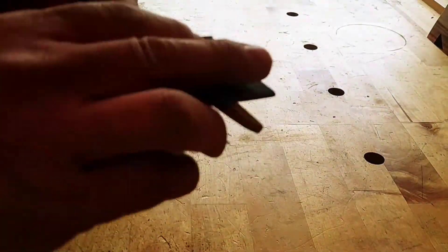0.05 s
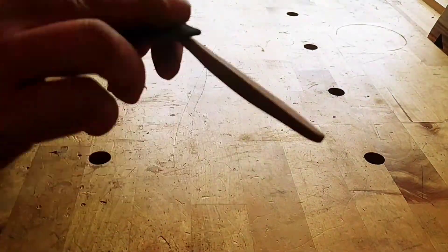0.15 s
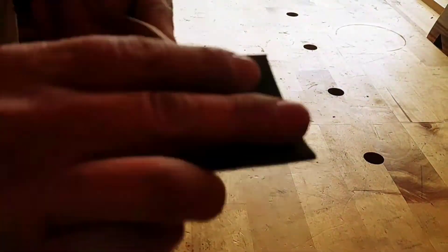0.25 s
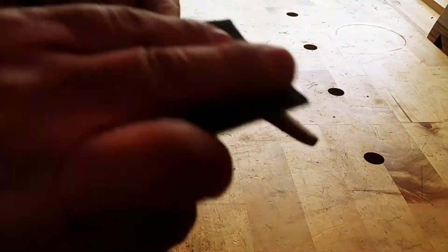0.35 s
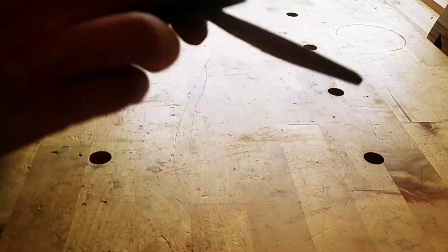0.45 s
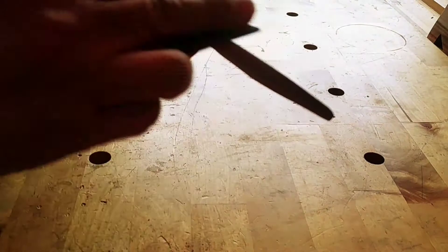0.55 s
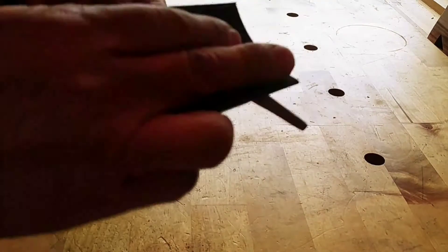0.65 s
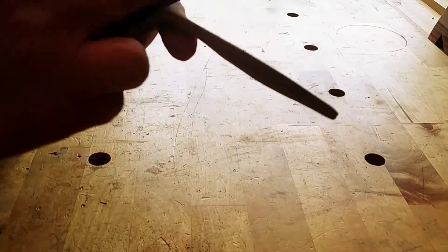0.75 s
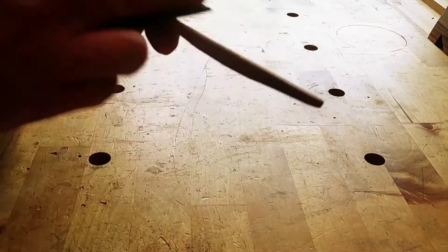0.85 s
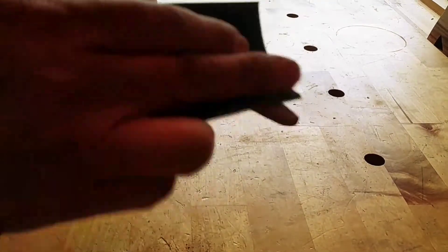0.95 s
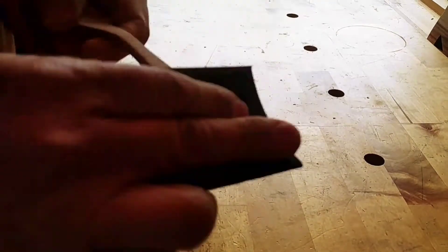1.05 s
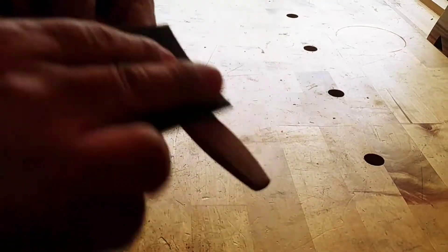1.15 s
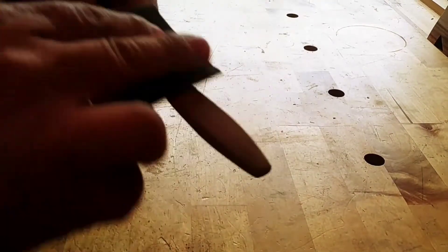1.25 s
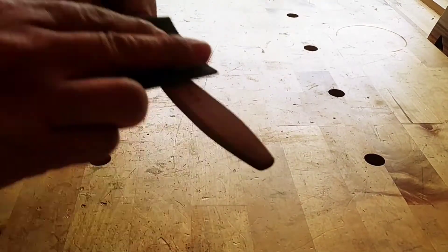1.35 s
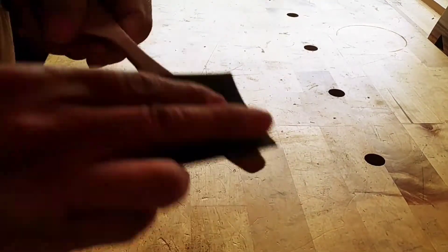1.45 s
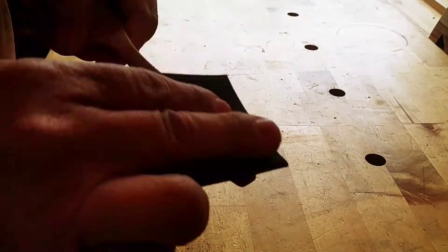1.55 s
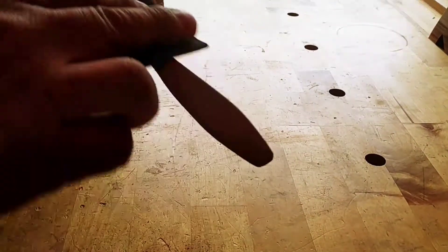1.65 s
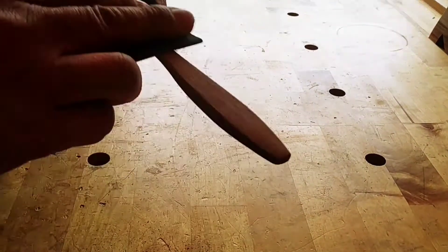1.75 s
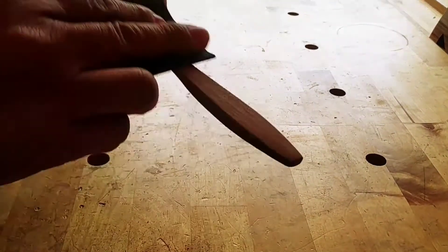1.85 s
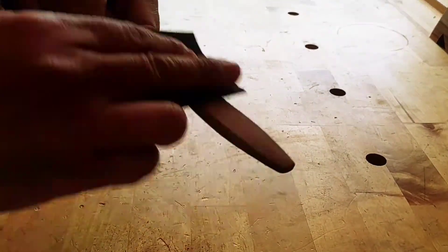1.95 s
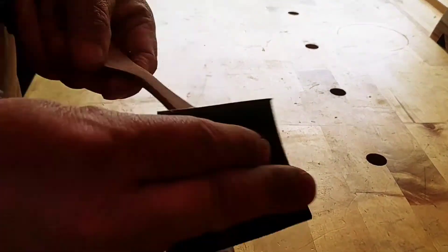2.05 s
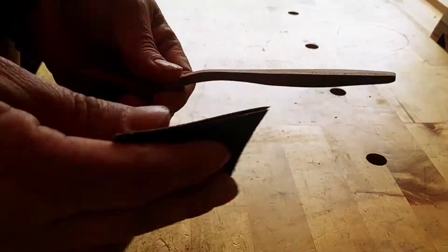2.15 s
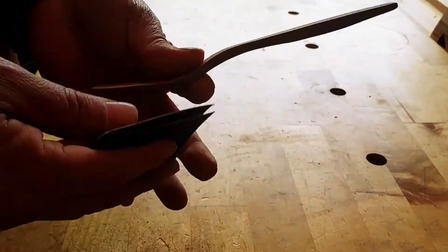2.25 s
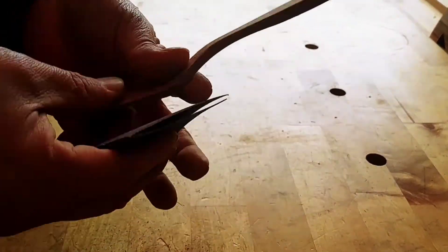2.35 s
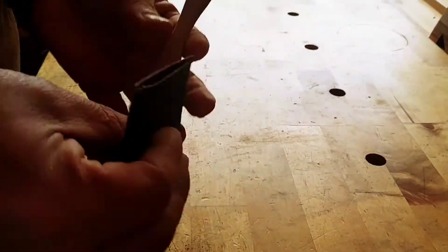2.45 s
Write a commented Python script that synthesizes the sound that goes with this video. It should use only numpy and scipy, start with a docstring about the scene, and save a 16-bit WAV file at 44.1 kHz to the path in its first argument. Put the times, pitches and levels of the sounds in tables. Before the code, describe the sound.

Sandpaper scrapes rapidly back and forth on a thin wooden blade, about fifteen strokes a second, after a brief faint brushing and ending in near quiet; close stereo microphone, small dry room, low rumble.

```python
"""Fast, gritty scrapes to and fro: sandpaper rubbed along a thin wooden blade close to a two-port microphone.
Dense random ticks make the grit; each stroke shapes them in five bands and rings one band of the blade.
Before and after the strokes the same grit, played softly, is the paper brushing lightly.
Short reflections surround it, over low, slowly wandering workshop rumble and faint hiss.
"""
import sys
import numpy as np
from scipy import signal
from scipy.fft import rfft, irfft
from scipy.io import wavfile
from scipy.ndimage import uniform_filter1d

SR = 44100
rng = np.random.default_rng(int(sys.argv[2]) if len(sys.argv) > 2 else 0)


def persist_wave(psi):
    """Save psi, clipped to +-1, as 16-bit WAV."""
    counts = np.round(np.clip(psi, -1, 1) * 32767).astype(np.int16)
    wavfile.write(sys.argv[1], SR, np.atleast_2d(counts).T)


N = 110250  # 2.5 s

# Colour of the grit at each port: (frequency [Hz], left gain [dB], right gain [dB])
PORT_COLOUR = [(300, -25.5, -26), (556, -25, -26.5), (855, -21, -23.5), (950, -21.5, -24),
               (1430, -23.5, -25.5), (2330, -13, -16), (3230, -7.5, -10), (3570, -9, -17.5),
               (4230, -8, -11), (5500, -5.5, -13), (6300, -5.5, -19), (7040, -5.5, -23.5),
               (7220, -0.5, -23.5), (7670, 2.5, -20.5), (8480, -7.5, -22), (9510, -18, -31),
               (11160, -25.5, -30.5), (11400, -21, -33.5), (13500, -23, -25.5), (15500, -19, -31.5)]
# How much of the grit both ports share: (frequency [Hz], likeness [0-1])
GRIT_LIKENESS = [(500, .9), (1500, .5), (3000, .45), (5000, .3), (9000, .15)]
BODY_HZ, RASP_HZ, TREBLE_HZ, AIR_HZ = 1470, 3960, 6570, 9700  # edges of body, rasp, middle, treble, air
LOW_CUT_HZ = 250


def sanding():
    """Grit takes on the colour of each port, then the hand drives its five bands separately."""
    hz = np.fft.rfftfreq(N, 1 / SR)
    ports = pair(*grit(), GRIT_LIKENESS, hz)
    under = [1 / (1 + (hz / edge) ** 8) for edge in (BODY_HZ, RASP_HZ, TREBLE_HZ, AIR_HZ)]
    shares = [under[0], under[1] - under[0], under[2] - under[1], under[3] - under[2], 1 - under[3]]
    low_cut = 1 / (1 + (LOW_CUT_HZ / (hz + 1)) ** 4)
    bands = []
    for port in range(2):
        colour = low_cut * gain_of(read(PORT_COLOUR, hz, col=port + 1))
        bands.append([coloured(ports[port], colour * share) for share in shares])
    bands = np.array(bands)
    reference = np.std(bands[0, 1] + bands[0, 2])  # left rasp plus middle sets the level
    return (bands * hand()).sum(1) / reference


# How strongly the paper still drags while the hand turns, body to air: gain per band [dB]
DRAG_DB = [-10, -7.5, -19.5, -46, -14]
ROUND_MS, DRAG_SAMPLES = 4.1, 3500  # smoothing of the stroke edges and of the drag


def hand():
    """The hand's motion as gain over time (port, band): strokes, drag between them, light brushing."""
    t = np.arange(N) / SR
    power = uniform_filter1d(stroke_power(t), int(ROUND_MS * SR / 1000), axis=2)
    drag = uniform_filter1d(power, size=DRAG_SAMPLES, axis=2) * gain_of(DRAG_DB)[:, None] ** 2
    power += drag * ((t > STROKES[0][0]) & (t < STROKES[-1][0]))
    power += brush_power(t)
    return np.sqrt(abs(power))


# Strokes of the paper; level, treble and rasp are at mid-hold, swells run across the hold:
# (start [s], blade ring [Hz], hold [s], level [dB], level swell [dB], rise [ms], fall [ms], treble [dB],
#  rasp [dB], body [dB], left over right above the body [dB], rasp swell [dB], treble swell [dB])
STROKES = [(0.208, 2160, 0.064, -23.5, -7.5, 3, 7.9, -2, 0, -2, 1.5, -7, -4),
           (0.318, 3670, 0.061, -27.5, 3.5, 12, 1, -2.5, -0.5, 1.5, -0.5, 7, 6),
           (0.404, 4170, 0.035, -18, -6.5, 1.7, 8.1, -7.5, -2, -3, 0, -1, 9),
           (0.48, 5800, 0.039, -25, -3, 2.8, 5.4, 2.5, 2, -2.5, -1, 5, 1),
           (0.549, 2950, 0.04, -22.5, -3.5, 11.5, 3.9, -1, 0, -1, -0.5, 5, -1),
           (0.612, 4440, 0.049, -30.5, -4, 2.6667, 2.6667, 6, 5, 2, -3, 3, 0),
           (0.691, 2350, 0.036, -31, -11, 13.3, 9.1, 10, 5.5, 7.5, -2, 19, 19),
           (0.754, 2740, 0.042, -27.5, 1, 11, 1, 0, -1, -2, -3, 1, 9),
           (0.824, 2070, 0.041, -28, -5.5, 6.7, 5.2, 2, 3.5, 5, -0.5, 9, 8),
           (0.901, 4700, 0.043, -28.5, -3, 5.2, 3.8, 3.5, 1, 5, -3, 3, 3),
           (0.967, 5000, 0.038, -25, 6.5, 3.9, 2.2, -6.5, 0, 0, 0.5, 7, -11),
           (1.027, 2550, 0.051, -26, -5, 10, 6.7, -1.5, 2, 5, -1, -2, 10),
           (1.09, 4800, 0.036, -25, -3.5, 15, 14, 0, 0.5, -0.5, -1.5, 8, 5),
           (1.158, 4070, 0.044, -28, -1, 2.3333, 6, 3.5, -0.5, -0.5, -2, 10, 8),
           (1.221, 3850, 0.038, -25.5, 5, 1, 9.2, -1, -1, -2.5, -1, -5, -3),
           (1.28, 6000, 0.039, -25.5, -2.5, 3.1, 9.4, 6.5, 1, -4, -2.5, 5, 0),
           (1.343, 3700, 0.031, -19.5, 9.5, 4.4, 8.8, 3, -1.5, -2, -0.5, -4, -5),
           (1.406, 2960, 0.034, -28, -6.5, 4.3, 5, 8.5, 1.5, 2, -3.5, 6, 3),
           (1.472, 3420, 0.028, -24, -2.5, 23, 2, 5, 0, 0.5, -1.5, 2, 4),
           (1.522, 4830, 0.035, -32.5, 5, 1.3333, 8.1, 11.5, 1, 3, -3, 6, -2),
           (1.594, 2600, 0.039, -23.5, -4, 8.5, 2, 2.5, -6.5, -1.5, -0.5, -13, -6),
           (1.654, 6240, 0.032, -30.5, -1.5, 7.4, 11, 10.5, 0.5, 4.5, -3.5, 9.5, 0.5),
           (1.734, 3520, 0.028, -23.5, -1.5, 10, 11.6, 3, -2, -0.5, -0.5, 6, -1),
           (1.782, 6700, 0.036, -28, 11, 4.9, 8.9, 8.5, -3.5, 3.5, -3, 5.5, 2),
           (1.851, 3300, 0.038, -23.0, 2.5, 4.9, 8.6, 2.5, 0, -2, -2, -2.5, 6),
           (1.918, 1950, 0.033, -24.5, -4.5, 8.9, 3.3333, 4.5, -2, -2.5, -2, 3.5, -7),
           (1.971, 3930, 0.034, -26, 2, 6.1, 5.7, 3.5, 2.5, 1.5, -2, 3, 6),
           (2.032, 3400, 0.027, -26.5, 1, 2.3, 6.8, 7.5, -1.5, -3.5, -3.5, 7, 1),
           (2.086, 2850, 0.046, -27, 2.5, 39, 6.5, 5, 0, 2, -2.5, -5, 2),
           (2.162, 3020, 0.057, -27, -2.5, 1.6, 3.6, 6, 2.5, 5, -3, 13.5, 0.5)]
# Moments where the grit bites harder: (onset [s], nominal peak level [dB])
BITES = [(0.211, 1.5), (0.217, 1.5), (0.5124, -11), (0.6552, -13), (0.717, -14.5), (1.1993, -21),
         (1.2226, -15), (1.304, -8), (1.3575, -3), (1.367, -1), (1.4072, -13.5), (1.4196, -4.5),
         (1.5238, -19), (1.5443, -3.5), (1.6018, -3), (1.6904, -18), (1.8096, -15.5), (1.9196, -9)]
BITE_MS, BITE_CREST_DB = 1.3, 17.5  # delay and half width; nominal peak over mean level
ARCH_DB = 1.5  # the hand is fastest in mid-stroke
EDGE_DB = -20  # level change over one rise or fall time
AIR_FOLLOWS = 0.46  # share of the treble change that reaches the air band


def stroke_power(t):
    """Each stroke rises, arches over its hold and falls; faster rubbing and bites add power."""
    out = np.zeros((2, 5, N))
    for (start, _, hold, db, swell_db, rise_ms, fall_ms, treble_db, rasp_db, body_db, pan_db,
         rasp_swell_db, treble_swell_db) in STROKES:
        near = slice(round((start - .08) * SR), round((start + hold + .12) * SR))
        since = t[near] - start
        along = np.clip(since / hold, 0, 1) - .5
        rise = 1000 * np.maximum(-since, 0) / rise_ms
        fall = 1000 * np.maximum(since - hold, 0) / fall_ms
        arch_db = -ARCH_DB * (2 * along) ** 2
        power = gain_of(db + swell_db * along + arch_db + EDGE_DB * (rise + fall)) ** 2
        for onset, peak_db in BITES:
            if start - .01 < onset < start + hold + .01:
                bump = np.exp(-(1000 * (t[near] - onset) / BITE_MS - 1) ** 2)
                power = power + gain_of(peak_db - BITE_CREST_DB) ** 2 * bump
        rasp = rasp_db + rasp_swell_db * along
        treble = treble_db + treble_swell_db * along
        flat = 0 * along
        left_db = [flat + body_db, rasp, flat, treble, AIR_FOLLOWS * treble]
        # the treble and its swell reach only the left port; the right sits lower above the body by the left-
        # over-right value
        right_db = [flat + body_db, rasp - pan_db, flat - pan_db, flat - pan_db, flat - pan_db]
        out[..., near] += power * gain_of([left_db, right_db]) ** 2
    return out


# Light brushing before and after the strokes; band columns are relative to the level:
# (time [s], level [dB], treble [dB], rasp [dB], body [dB])
BRUSH_BEFORE = [(0, -47, -15, 12.5, 14), (0.018, -50, -7, 13.5, 12), (0.026, -56, 1, 5, 29.5),
                (0.055, -54.5, 2, 2, 19), (0.062, -55, 9.5, 4.5, 19), (0.1, -49.5, 6, -4, 11),
                (0.115, -54, 1, -2, 13), (0.14, -71, -2, 5, 2), (0.15, -62, -2, -11, -7),
                (0.165, -57.5, 5, 1, 4), (0.19, -60, 1, 1, -6), (0.2, -36.5, 3, -3, 10)]
BRUSH_AFTER = [(2.231, -54, -8, 11, 6), (2.245, -58, -17, 16.5, 9), (2.268, -64, -13, 5, 0),
               (2.279, -48, 5, -1.5, -3), (2.292, -65, -2, 4, 0), (2.32, -81, -1, 0, 0),
               (2.339, -74, -3, 1, 0), (2.352, -73, -3, 0, 0), (2.361, -54, -10.5, -1, 5),
               (2.385, -64.5, -10, 3.5, -5), (2.411, -76, -4, -3, 5), (2.416, -63, -7, 17, 5),
               (2.421, -75, -6, 3, 0), (2.455, -77.5, -4.5, 0, 3), (2.462, -54, -6, 3, -2.5),
               (2.467, -56.5, -6, 2, -3), (2.473, -40.5, -11, -4, 6), (2.488, -59, -4, 1, 9),
               (2.499, -57, 0, 0, 0)]
BRUSH_MID_DB, BRUSH_AIR_DB = -9, 0  # brushing is hollower in the middle band


def brush_power(t):
    """Light contact of the paper: a wavering level with its own band balance, equal at both ports."""
    out = np.zeros((5, N))
    for part in (BRUSH_BEFORE, BRUSH_AFTER):
        s, db, treble_db, rasp_db, body_db = np.transpose(part)
        balance_db = (body_db, rasp_db, BRUSH_MID_DB, treble_db, BRUSH_AIR_DB)
        bands_db = [np.interp(t, s, db + band_db) for band_db in balance_db]
        out += gain_of(bands_db) ** 2 * ((t > s[0] - .002) & (t < s[-1] + .002))
    return out


GRIT_PER_S, GRIT_SPREAD_DB = 20000, 1.5  # tick rate; scale of the random boost per tick
CLUMP_DB, CLUMP_MS = 1, 2.1  # depth and smoothing of the clumping
PATCH_DB = 2.5  # colour drifts as other parts of the blade sound
RING_DB, RING_OCTAVES = 4, 0.13  # height and half width of the band that rings in each stroke
BEFORE_RING_HZ, BEFORE_RING_DB = 3450, 8.5  # ring of the brushing before
AFTER_RING_HZ, AFTER_RING_DB = 5330, 6  # ring of the brushing after


def grit():
    """Abrasive grains make dense, uneven, clumped ticks; colour drifts and a blade band rings per stroke."""
    ticks = (rng.random((2, N)) < GRIT_PER_S / SR) * rng.standard_normal((2, N))
    ticks = ticks * gain_of(GRIT_SPREAD_DB * np.minimum(rng.exponential(1, (2, N)), 4))
    wide = int(CLUMP_MS * SR / 1000)
    clumps = evened(uniform_filter1d(uniform_filter1d(rng.standard_normal(N), wide), wide))
    hz, t, z = signal.stft(ticks * gain_of(CLUMP_DB * clumps), SR, nperseg=512, noverlap=384)

    starts = [0] + [row[0] for row in STROKES] + [BRUSH_AFTER[0][0]]
    now = np.searchsorted(starts, t + .01, "right") - 1  # the ring moves 10 ms ahead of the stroke
    ring_hz = np.r_[BEFORE_RING_HZ, [row[1] for row in STROKES], AFTER_RING_HZ][now]
    ring_db = np.r_[BEFORE_RING_DB, np.full(len(STROKES), RING_DB), AFTER_RING_DB][now]
    octaves_off = np.log2((hz[:, None] + 1) / ring_hz)
    ring_db = ring_db * np.exp(-(octaves_off / RING_OCTAVES) ** 2)

    patches = rng.standard_normal(z.shape[1:])
    patches = uniform_filter1d(uniform_filter1d(patches, size=3, axis=0), size=8, axis=1)
    z = z * gain_of(PATCH_DB * evened(patches) + ring_db)
    return signal.istft(z, nperseg=512, noverlap=384)[1][:, :N]


ROOM_DB, ROOM_T60 = -16, .06  # reflection level; time to fall 60 dB [s]


def room(x):
    """A short decaying spray of reflections, different at each port."""
    t = np.arange(SR // 4) / SR
    tail = rng.standard_normal((2, len(t))) * gain_of(-60 * t / ROOM_T60) * (t > .003)
    return signal.fftconvolve(x, tail / np.linalg.norm(tail[0]), axes=1)[:, :N]


# Spectrum of the workshop rumble: (frequency [Hz], relative level [dB per Hz])
RUMBLE_COLOUR = [(13, -42), (22, -12), (86, 1), (151, -1.5), (215, -4.5), (320, -15.5), (420, -28),
                 (700, -120)]
RUMBLE_DB = -45.5  # before the left-right tilt
SWELL_DB = 1.5  # the rumble wanders


def rumble(hz):
    """Low workshop noise: filtered noise whose level wanders slowly."""
    low = pair(*rng.standard_normal((2, N)), BACKGROUND_LIKENESS, hz)
    swell = uniform_filter1d(uniform_filter1d(rng.standard_normal(N), size=3000), size=3000)
    low = coloured(low, gain_of(read(RUMBLE_COLOUR, hz))) * gain_of(SWELL_DB * evened(swell))
    return gain_of(RUMBLE_DB) * evened(low)


# Spectrum of the hiss: (frequency [Hz], relative level [dB per Hz])
HISS_COLOUR = [(190, -54), (320, -5), (504, -9), (583, -9.5), (757, -9.5), (1600, -32), (1760, -23.5),
               (15500, -48)]
HISS_DB = -57.5  # before the left-right tilt


def hiss(hz):
    """Faint steady noise shaped by its own spectrum."""
    noise = pair(*rng.standard_normal((2, N)), BACKGROUND_LIKENESS, hz)
    return gain_of(HISS_DB) * evened(coloured(noise, gain_of(read(HISS_COLOUR, hz))))


# How much of the rumble and hiss both ports share: (frequency [Hz], likeness [0-1])
BACKGROUND_LIKENESS = [(60, 0.94), (150, 0.98), (280, 0.94), (550, 0.66), (1650, 1), (4970, 0)]
BACKGROUND_LEFT_DB = 1  # left over right


def background():
    """Rumble and hiss add up, a little stronger at the left port."""
    hz = np.fft.rfftfreq(N, 1 / SR)
    tilt_db = [[BACKGROUND_LEFT_DB / 2], [-BACKGROUND_LEFT_DB / 2]]
    return (rumble(hz) + hiss(hz)) * gain_of(tilt_db)


LAG_S = 1.5e-4  # the right port hears the shared sound later


def pair(a, b, like, hz):
    """Two ports share part of what they hear, by frequency; the shared part reaches the right late."""
    like = np.clip(read(like, hz), -1, 1)
    late = np.exp(-2j * np.pi * hz * LAG_S)
    shared = coloured(a, like * late)
    own = coloured(b, np.sqrt(1 - like ** 2))
    return np.array([a, shared + own])


def gain_of(db):
    """Turns dB into an amplitude gain."""
    return 10 ** (np.asarray(db) / 20)


def evened(x):
    """Scales to rms 1."""
    return x / np.sqrt(np.mean(x ** 2) + 1e-20)


def read(points, hz, col=1):
    """Reads a table column on a log-frequency axis."""
    points = np.array(points)
    return np.interp(np.log(hz + 1), np.log(points[:, 0] + 1), points[:, col])


def coloured(x, gain):
    """Filters the whole signal by a gain per frequency."""
    return irfft(rfft(x) * gain, N)


def scene():
    """Sanding and its reflections over the workshop background."""
    near = sanding()
    return near + gain_of(ROOM_DB) * room(near) + background()


SOFT_PEAK, EDGE_HZ = .9, 15700  # size that peaks are rounded towards; upper band limit


def record(dry):
    """The recorder softly rounds the sharpest peaks, then a low-pass limits the band."""
    soft = SOFT_PEAK * np.tanh(dry / SOFT_PEAK)
    low_pass = signal.firwin(511, EDGE_HZ, window=("kaiser", 9), fs=SR)
    return signal.oaconvolve(soft, low_pass[None], "same")


dry = scene()
out = record(dry)
persist_wave(out)
```